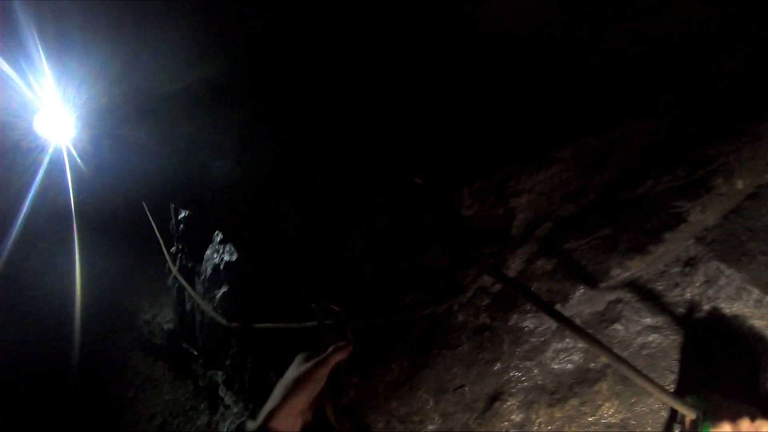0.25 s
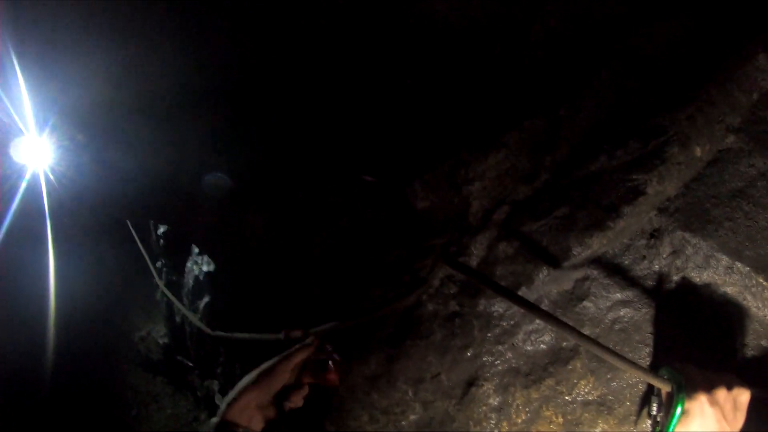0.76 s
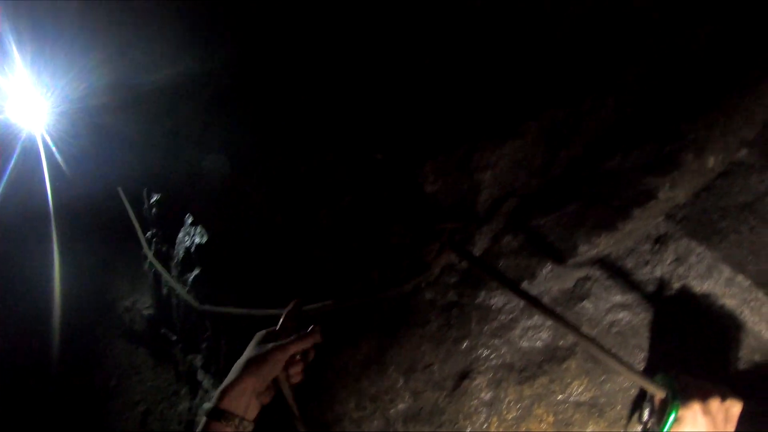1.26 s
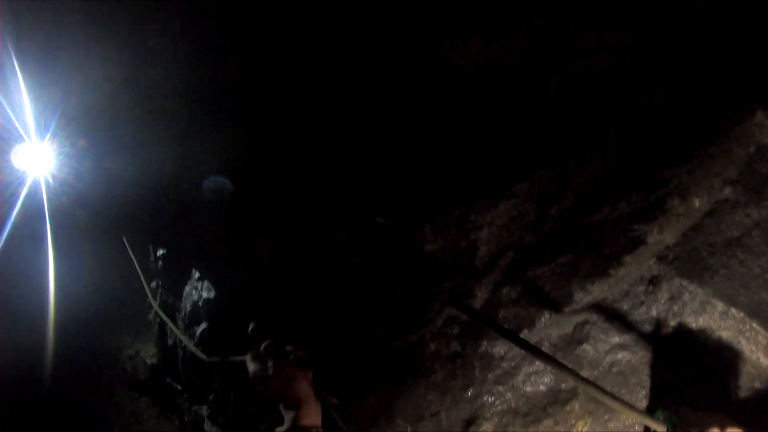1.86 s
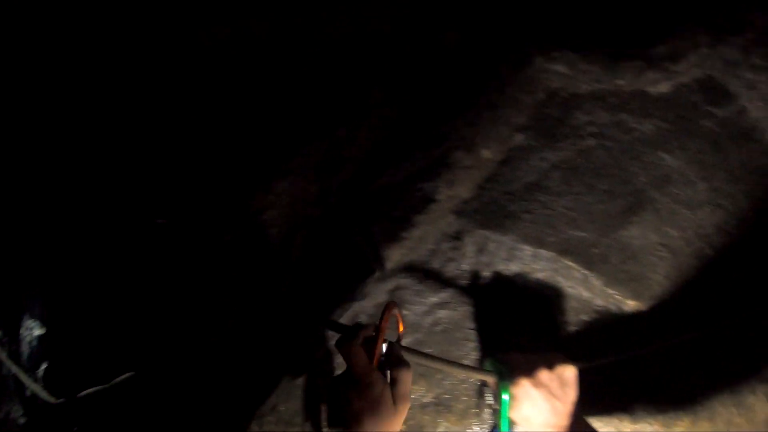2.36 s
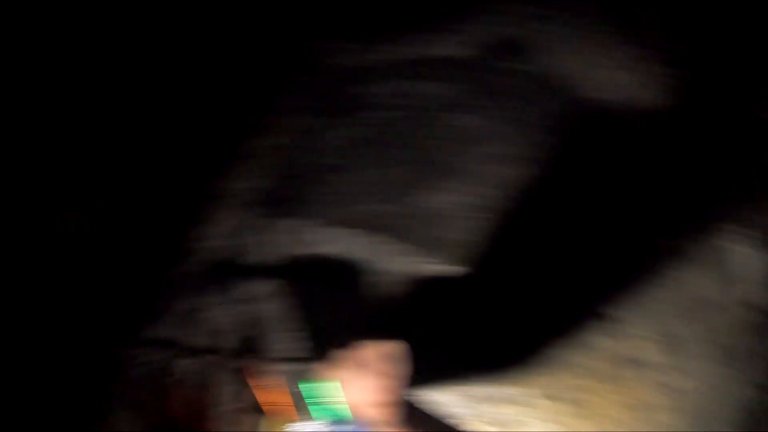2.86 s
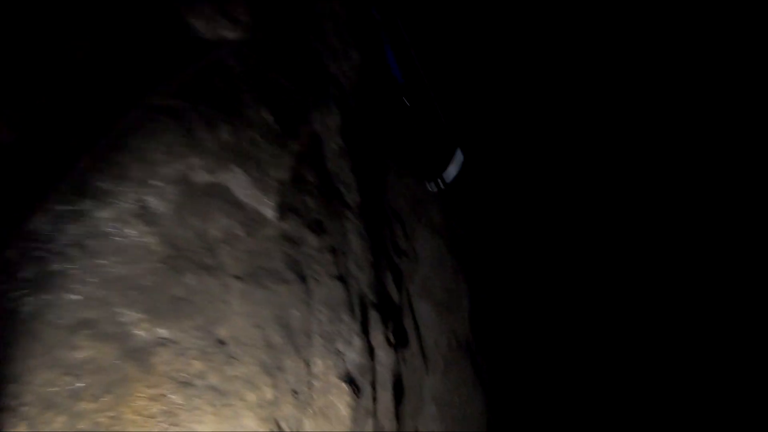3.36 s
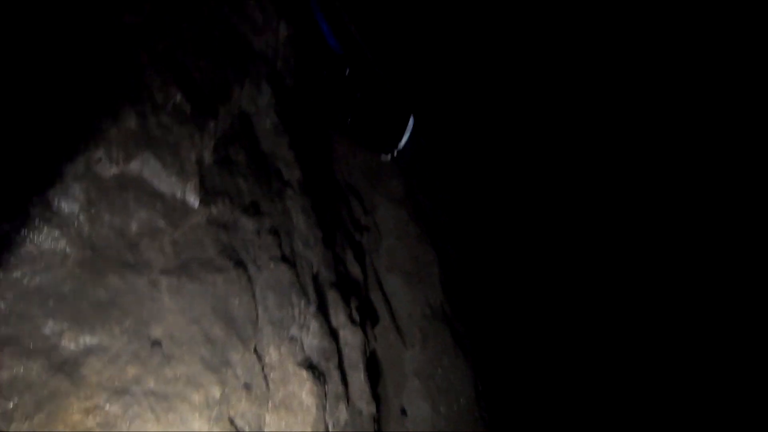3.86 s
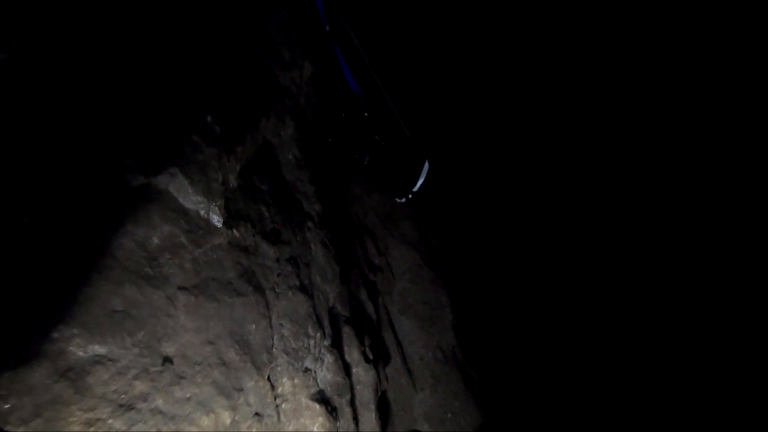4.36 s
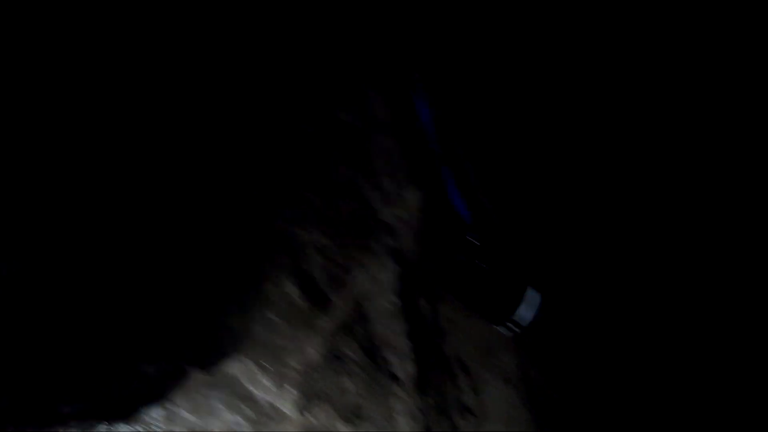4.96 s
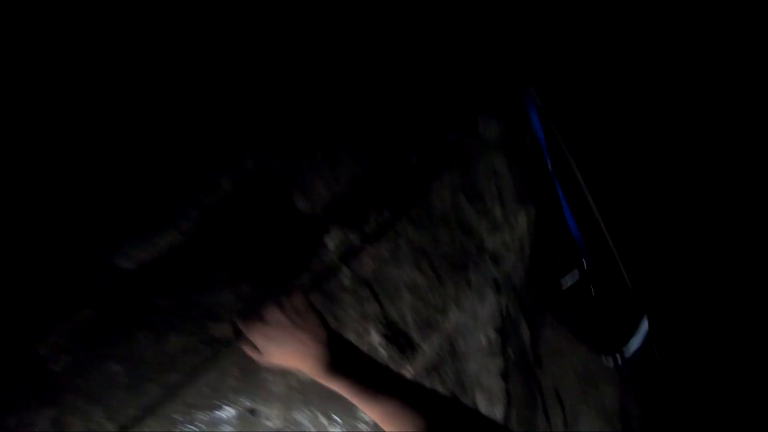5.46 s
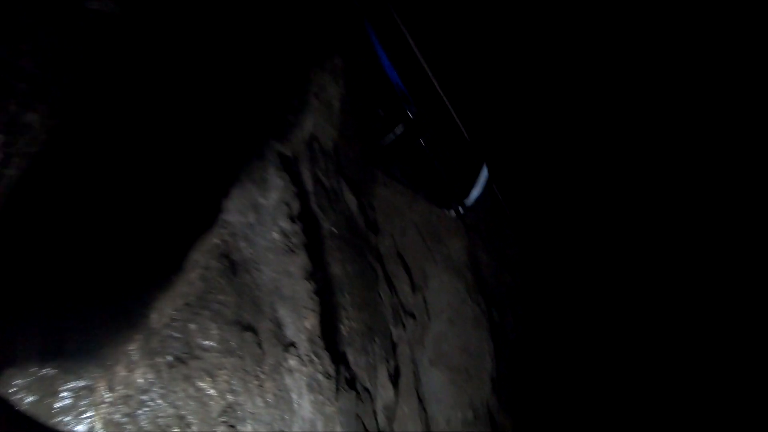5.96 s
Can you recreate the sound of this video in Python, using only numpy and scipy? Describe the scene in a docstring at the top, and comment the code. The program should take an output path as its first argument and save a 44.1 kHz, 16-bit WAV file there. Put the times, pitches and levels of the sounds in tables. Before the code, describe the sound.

Light metal climbing gear clinks and snaps close by, followed by clothing rustle, scraping soles and dull bumps on stone in a reverberant cavern.

```python
"""Carabiners jangle, ding and snap on a rope, then boots scuff gritty rock in a cave, heard from a helmet.
Metal and stone ring as sums of decaying modes under a noise burst, then scatter off a near wall.
Cloth, rope and soles rub as coloured noise with random grains; thuds, creaks and air are swelling noise.
A steady hush, a low drone and one far squeak lie behind.
Reverberant tails follow most blows; noise washes follow the loudest."""
import sys
import numpy as np
from scipy import signal
from scipy.fft import rfft, irfft, next_fast_len
from scipy.io import wavfile
from scipy.ndimage import uniform_filter1d

SR = 44100
rng = np.random.default_rng(int(sys.argv[2]) if len(sys.argv) > 2 else 0)


def digitize_waveform(pressure):
    """Quantize a signal to 16-bit integers and store it at the path in sys.argv[1].

    Rows of a 2-D input are taken as channels; values are limited to [-1, 1].
    """
    field = np.atleast_2d(pressure).T
    bounded = np.clip(field, -1, 1)
    quanta = np.round(bounded * 32767).astype(np.int16)
    wavfile.write(sys.argv[1], SR, quanta)


N = 273928
TIME = np.arange(N) / SR
HIT_TIME = TIME[:SR // 8]
SIDES = np.array([[1], [-1]])  # left, right

# Noise colour of metal striking metal: frequency_hz, density_db (relative, per Hz)
METAL_CRACK = [(300, -54), (750, -14), (1400, -3), (2200, -5.5), (4500, -3), (8000, 5.5), (10500, 0.5),
               (11700, -8.5), (14000, -11.5), (16000, -38.5)]


def from_db(db):
    """Amplitude is the exponential of level: 20 dB is a factor of ten."""
    return np.exp(np.asarray(db) * np.log(10) / 20)


def lean(pan_db):
    """Interaural level difference: left minus right in dB, shared equally between the sides."""
    return from_db(SIDES * pan_db / 2)


def rms_one(x):
    """Normalisation of power: scale to unit rms."""
    return x / np.sqrt(np.mean(x ** 2) + 1e-20)


def at_hz(points, hz):
    """Spectral interpolation along a logarithmic frequency axis."""
    known, values = np.transpose(points)
    return np.interp(np.log(hz + 1), np.log(known), values)


def band(x, low, high):
    """Causal band-pass filtering between two frequencies in Hz."""
    return signal.sosfilt(signal.butter(3, [low, high], "band", fs=SR, output="sos"), x + 1e-18)


def coloured(x, spectrum):
    """Spectral shaping and partial coherence: mid and side noises mix into two related ears; rms 1."""
    # Left-right coherence of noise: frequency_hz, correlation (-1 to 1)
    likeness = [(30, -0.4), (150, 0.048), (280, -0.14), (500, 0.29), (1000, -0.15), (3000, 0.6),
                (5000, 0.48), (8000, -0.33), (14000, 0.15)]
    size = next_fast_len(x.shape[1])
    mid, side = rfft(x, size)
    hz = np.arange(len(mid)) * SR / size
    alike = at_hz(likeness, hz)
    # Extra roll-off well above the last point of the colour
    beyond = 1 / (1 + (hz / (2 * spectrum[-1][0])) ** 4)
    pair = np.sqrt(1 + alike) * mid + np.sqrt(1 - alike) * side * SIDES
    shaped = irfft(pair * beyond * from_db(at_hz(spectrum, hz)), size)
    return rms_one(shaped[:, :x.shape[1]])


def airy(spectrum, level_db):
    """Broadband turbulence modelled as stationary noise of one colour and rms level."""
    return from_db(level_db) * coloured(rng.standard_normal((2, N)), spectrum)


def swell(s, length_s, attack_s, t60):
    """Envelope: linear rise from s, exponential decay from s + length_s."""
    since = TIME - s
    decay_db = -60 * np.clip((since - length_s) / t60, 0, 3)
    return np.clip(since / attack_s, 0, 1) * from_db(decay_db)


def swells(rows, attack_s, t60):
    """Incoherent addition: the powers of overlapping swells (start_s, length_s, level_db) sum."""
    power = sum((from_db(level_db) * swell(s, length_s, attack_s, t60)) ** 2
                for s, length_s, level_db in rows)
    return np.sqrt(power)


def flutter(per_s):
    """Slow random modulation: normal values drawn per_s times a second, joined by straight lines."""
    return np.interp(TIME * per_s, np.arange(N), rng.standard_normal(N))


def friction(spectrum, grains_per_s, grain_db, judder_db):
    """Stick-slip friction: countless tiny slips, stronger single grains and a juddering grip."""
    sizes = from_db(4.3 * np.minimum(rng.exponential(1, N), 4.5))
    struck = rng.random(N) < grains_per_s / SR
    grains = rms_one(struck * sizes * rng.standard_normal((2, N)))
    slips = rng.standard_normal((2, N)) + from_db(grain_db) * grains
    return coloured(slips * from_db(judder_db * flutter(90)), spectrum)


def strike(modes, crack, crack_db, chatter_s, phase_spread, scatter_db, rise_s):
    """Modal impact: damped sinusoids with a phase for each ear, plus a burst of micro-contacts."""
    hz, level_db, t60 = np.transpose(modes)[:, :, None]
    strength_db = level_db + scatter_db * rng.standard_normal(hz.shape)
    phase = 2 * np.pi * rng.random(hz.shape)
    ear_phase = phase_spread * hz / 7000 * rng.standard_normal(hz.shape) * SIDES[:, None]
    decay = from_db(strength_db - 60 * HIT_TIME / t60)
    ring = (decay * np.sin(2 * np.pi * hz * HIT_TIME + phase + ear_phase)).sum(axis=1)
    noise = coloured(rng.standard_normal((2, len(HIT_TIME))), crack)
    burst = noise * from_db(crack_db - 60 * HIT_TIME / chatter_s)
    return (ring + burst) * (1 - np.exp(-HIT_TIME / rise_s))


def contacts(rows, modes, crack, crack_db, phase_spread, scatter_db, rise_s, gain_db):
    """Position-dependent excitation: each blow sets the level of its first 20 ms in three bands."""
    # Edges of the low, middle and treble bands: frequency_hz
    edges_hz = [300, 2800, 5500, 15000]
    out = np.zeros((2, N + len(HIT_TIME)))
    for s, *levels_db, chatter_s, pan_db in rows:
        blow = strike(modes, crack, crack_db, chatter_s, phase_spread, scatter_db, rise_s)
        blow = blow * lean(pan_db)
        start = round(s * SR)
        for level_db, low, high in zip(levels_db, edges_hz, edges_hz[1:]):
            part = band(blow, low, high)
            gain = from_db(level_db + gain_db) / np.std(part[:, :SR // 50])
            out[:, start:start + len(HIT_TIME)] += part * gain
    return out[:, :N]


def near_wall(x, wall_db, wall_t60):
    """Early diffuse reflection: scatter from a rough wall at arm's length, delayed by 2.5 ms."""
    noise = rng.standard_normal((2, len(HIT_TIME)))
    scatter = noise * from_db(-60 * HIT_TIME / wall_t60) * (HIT_TIME > .0025)
    answer = from_db(wall_db) * rms_one(scatter) / np.sqrt(len(HIT_TIME))
    return x + signal.oaconvolve(x, answer, axes=1)[:, :N]


def cave(x, tail_db):
    """Late reverberation: convolution with noise whose treble dies away sooner."""
    # Decay of the chamber: frequency_hz, t60_s
    cave_t60 = [(200, 1.0), (2300, .9), (4500, .8), (8000, .6), (14000, .35)]
    # Colour of its answer: frequency_hz, level_db (relative)
    cave_colour = [(200, -5), (1200, 0.5), (2400, 0), (4500, -3), (7500, 3.5), (14000, 4)]
    t = TIME[:SR]
    edges = np.geomspace(150, 16000, 12)
    white, tail = rng.standard_normal((2, SR)), 0
    for low, high in zip(edges, edges[1:]):
        hz = np.sqrt(low * high)
        decay_db = at_hz(cave_colour, hz) - 60 * t / at_hz(cave_t60, hz)
        tail = tail + band(white, low, high) * from_db(decay_db)
    onset = 1 - np.exp(-t / 0.0041)
    answer = from_db(tail_db) * rms_one(tail * onset) / np.sqrt(SR)
    return x + signal.fftconvolve(x, answer, axes=1)[:, :N]


def wash(rows, colour, gain_db, t60):
    """Diffuse field: echoes of loud blows from every direction blur into exponentially fading noise."""
    power = 0
    for s, _, middle_db, treble_db, _, _ in rows:
        since = np.maximum(TIME - s, 0)
        loudness = np.hypot(from_db(middle_db), from_db(treble_db))
        onset = 1 - np.exp(-since / 0.0044)
        power = power + (loudness * from_db(-60 * since / t60) * onset) ** 2
    return np.sqrt(power) * airy(colour, gain_db)


def hush():
    """Stationary ambient noise: the cave's steady hush."""
    # Colour: frequency_hz, density_db (relative, per Hz)
    hush_colour = [(30, -6), (60, -1), (110, -13), (160, 5), (220, 1.5), (320, -22.5), (800, -1.5),
                   (1500, -23.5), (4000, -17), (7500, -11), (11000, -21.5), (15000, -56)]
    return airy(hush_colour, level_db=-72.5)


def drone():
    """Low-frequency resonance under steady broadband excitation: the chamber's drone."""
    # Colour: frequency_hz, density_db (relative, per Hz)
    drone_colour = [(60, -27), (115, -25.5), (150, -0.5), (185, 0), (260, -2.5), (340, -10.5), (600, -21.5)]
    return airy(drone_colour, level_db=-73) * lean(-1.2)


def hollow_swells():
    """Cavity resonance: noise in the chamber's hollow bands swells and dies away."""
    # Swells: start_s, length_s, level_db (before the trim below)
    hollows = [(1.87, 0.5, -72.5), (3.13, 0.3, -69), (3.45, 0.31, -67), (4.04, 0.22, -55.5),
               (4.52, .17, -62.5), (5.0, 0.28, -57), (5.33, 0.14, -65), (5.85, 0.48, -62.5)]
    # Colour: frequency_hz, density_db (relative, per Hz)
    hollow_colour = [(250, -23), (390, -7.5), (470, 1), (540, -14.5), (660, -12), (820, -3.5), (950, -16),
                     (1600, -16.5)]
    return swells(hollows, attack_s=0.033, t60=0.96) * airy(hollow_colour, level_db=1.5) * lean(-3)


def buffets():
    """Wind-induced pressure noise: gusts buffet the microphone as the head turns, over a steady draught."""
    # Gusts: start_s, level_db (before the trim below)
    gust_rows = [(3.19, -63), (3.3, -66), (3.83, -64), (4.12, -59), (4.44, -67), (4.66, -71), (5.03, -62),
                 (5.23, -63), (5.51, -66), (5.7, -60)]
    # Colour: frequency_hz, density_db (relative, per Hz)
    buffet_colour = [(18, -8.5), (35, 4.5), (52, -4.5), (80, -23.5), (140, -43)]
    length_s = 0.074
    gusts = swells([(s, length_s, level_db) for s, level_db in gust_rows], attack_s=0.017, t60=0.26)
    draught = from_db(-80.5)  # before the same trim
    return np.hypot(gusts, draught) * airy(buffet_colour, level_db=-2.5) * lean(-7)


def far_squeak():
    """Narrow-band noise with a long decay: a distant squeak smeared by the cave."""
    # Squeak: start_s, length_s, level_db (before the trim below)
    squeaks = [(.9, 0.19, -57)]
    # Colour: frequency_hz, density_db (relative, per Hz)
    squeak_colour = [(950, -35), (1130, -16), (1230, -1), (1330, -0.5), (1430, -9), (1620, -16),
                     (1900, -35)]
    return swells(squeaks, attack_s=0.034, t60=1.27) * airy(squeak_colour, level_db=-.3)


def footfalls():
    """Heavily damped impact: the body's weight settles on the rock as a soft, low-frequency thud."""
    # Weight on a boot or hand: start_s, length_s, level_db (before the trim below)
    thuds = [(.59, 0.035, -75), (1.74, .14, -67.5), (2.42, 0.045, -62.5), (4.19, .07, -60),
             (4.525, 0.02, -62.5), (4.63, 0.03, -62), (5.1, .06, -58), (5.965, .05, -52.5)]
    # Colour: frequency_hz, density_db (relative, per Hz)
    thud_colour = [(100, -38), (165, -1.5), (215, -4.5), (290, -5.5), (400, -33), (700, -29)]
    return swells(thuds, attack_s=0.0068, t60=0.48) * airy(thud_colour, level_db=-0.5)


def rubbing_gains():
    """Incoherent addition of friction sources: suit, swishes and scuffs set scrape, rasp and hiss."""
    # All levels here are before the trims in rubbing().
    # Suit rustle as the body moves: time_s, level_db
    movement = [(0, -71.5), (.3, -67.5), (.65, -75), (.95, -66), (1.3, -76.5), (1.62, -71), (1.79, -77.5),
                (2.17, -83), (2.51, -75), (2.74, -61.5), (3.42, -71.5), (4.1, -62), (4.42, -71),
                (4.85, -60), (5.2, -63), (5.88, -57), (6.21, -67.5)]
    # Sleeve or rope slides: start_s, length_s, level_db, hiss_db (against rasp)
    swishes = [(1.095, 0.094, -61, -5), (1.834, 0.057, -73.5, 4), (2.25, 0.19, -74, 6),
               (2.4, 0.019, -63.5, 7), (2.558, 0.37, -68.5, 5.5), (3.7, 0.032, -80, 16),
               (3.861, 0.044, -66, 2.5), (5.407, 0.076, -55, -17), (5.596, 0.047, -59, -38)]
    # Sole drags over rock: start_s, length_s, level_db, grit_db (rasp against scrape)
    scuffs = [(3.972, 0.31, -57.5, -7), (4.109, 0.026, -60.5, 7), (4.163, 0.034, -58, 4),
              (4.516, 0.073, -57, 7), (4.609, 0.047, -45, -1.5), (4.713, 0.031, -51.5, 0.5),
              (4.892, 0.06, -59.5, 0.5), (4.987, 1, -70.5, -11), (5.05, 0.033, -63.5, 5),
              (5.218, 0.043, -58.5, -1.5), (5.365, 0.027, -57, 1), (5.842, 0.064, -56, -1),
              (5.926, 0.073, -59, 0), (6.08, 0.16, -64.5, -28)]
    suit_db = [-11, 0, -1.5]  # scrape, rasp, hiss
    scuff_hiss_db = 3  # against the rasp of the grit
    movement_db = np.interp(TIME, *np.transpose(movement))
    power = np.outer(from_db(suit_db), from_db(movement_db)) ** 2
    for s, length_s, level_db, hiss_db in swishes:
        slide = from_db(level_db) * swell(s, length_s, attack_s=0.021, t60=0.25)
        power[1:] += np.outer(from_db([0, hiss_db]), slide) ** 2
    for s, length_s, level_db, grit_db in scuffs:
        drag = swell(s, length_s, attack_s=0.029, t60=0.22)
        echo = from_db(-15.5) * swell(s, length_s, attack_s=length_s, t60=1.96)
        shares = from_db([0, grit_db, grit_db + scuff_hiss_db])
        power += np.outer(shares, from_db(level_db) * np.hypot(drag, echo)) ** 2
    return np.sqrt(power)


def snags():
    """Random stick-slip: fibres and grit catch and let go in brief surges of uneven size."""
    per_s, surge_db, decay_s = 13, -4, 0.0084
    catches = (rng.random(N) < per_s / SR) * np.minimum(rng.exponential(1, N), 2)
    surge = signal.lfilter([1], [1, -np.exp(-1 / (decay_s * SR))], catches + 1e-18)
    smooth = uniform_filter1d(surge, size=180)  # 4 ms
    return rms_one(1 + from_db(surge_db) * smooth)


def rubbing():
    """Friction noise in three ranges: sleeves and rope rub all along, and soles drag over the rock."""
    # Colours, low range to high: frequency_hz, density_db (relative, per Hz)
    scrape_colour = [(110, -33), (200, -5.5), (310, -3.5), (450, -1), (640, -1), (1000, 0), (1800, 1),
                     (2500, -12.5), (4000, -37)]
    # Rasp: frequency_hz, density_db (relative, per Hz)
    rasp_colour = [(1300, -10.5), (2300, -2), (3400, 1), (4600, -2.5), (6000, -15), (9000, -42)]
    # Hiss: frequency_hz, density_db (relative, per Hz)
    hiss_colour = [(3500, -17), (5500, 2.5), (7500, 4.5), (10300, -3), (11700, -15.5), (14000, -17.5),
                   (16000, -66.5)]
    scrape_gain, rasp_gain, hiss_gain = rubbing_gains()
    scrape = friction(scrape_colour, grains_per_s=800, grain_db=-4.5, judder_db=0.5)
    rasp = friction(rasp_colour, grains_per_s=990, grain_db=-8.5, judder_db=1.0)
    hiss = friction(hiss_colour, grains_per_s=1300, grain_db=-6.5, judder_db=0.4)
    scrape = scrape_gain * from_db(2.5) * scrape
    rasp = rasp_gain * from_db(0.4) * rasp
    hiss = hiss_gain * from_db(-1.2) * hiss
    return scrape * snags() * lean(-2.8) + (rasp + hiss) * snags() * lean(-1.2)


def steps():
    """Damped modal impact on stone: soles and gear bump the rock, and loose stones tip under a boot."""
    # Contact levels are before gain_db; mode levels are before random scatter.
    # Bumps: start_s, low_db, middle_db, treble_db, chatter_t60_s, pan_db
    boot = [(.4804, -63.5, -64.5, -67, 0.039, 1), (.8155, -61, -72, -81, 0.036, 1),
            (2.383, -62.5, -70, -67, 0.094, -2), (3.0865, -60.5, -76.5, -75, 0.037, 5),
            (3.9924, -73, -59, -54, 0.019, -3), (4.0219, -61, -56.5, -56.5, 0.011, -5),
            (4.2065, -52, -60, -49.5, 0.026, -8), (4.4723, -52, -52, -64, 0.15, -1.5),
            (4.5302, -44, -64, -48.5, 0.19, -1.5), (4.654, -41, -42.5, -51, 0.12, -0.5),
            (5.0924, -70, -53, -58.5, 0.037, -2), (5.3239, -76, -52, -73, 0.2, 2),
            (5.9809, -50.5, -53, -49, 0.15, -0.5)]
    # Bump modes: frequency_hz, level_db, t60_s
    boot_modes = [(370, -2.5, 0.069), (488, -8.5, .05), (884, -4.5, .05), (940, 3, 0.024),
                  (1142, -4.5, 0.063), (1286, -10, 0.052), (1480, -11, 0.029), (2920, -19, 0.021)]
    # Tipping stones: start_s, low_db, middle_db, treble_db, chatter_t60_s, pan_db
    tock = [(4.3731, -51, -66, -74, 0.09, -2.5), (5.4735, -53, -62, -62, 0.025, -2.5)]
    # Stone modes: frequency_hz, level_db, t60_s
    tock_modes = [(864, -23, 0.034), (1290, 1, 0.036), (1760, 3.5, 0.026), (1930, 4, 0.019),
                  (2590, -7, .022)]
    # Contact noise on stone: frequency_hz, density_db (relative, per Hz)
    stone_crack = [(100, -13), (200, 17), (500, 13), (1500, 11), (4000, -13), (8000, -6.5), (11000, -29),
                   (15000, -51)]
    blows = contacts(boot, boot_modes, stone_crack, crack_db=5.5, phase_spread=1.32,
                     scatter_db=6.0, rise_s=0.0002, gain_db=-2.33)
    blows += contacts(tock, tock_modes, stone_crack, crack_db=-4, phase_spread=2.1,
                      scatter_db=6.0, rise_s=0.0009, gain_db=0)
    return cave(near_wall(blows, wall_db=-7.0, wall_t60=0.15), tail_db=-6.5)


def rope():
    """Stick-slip under load: the rope's sheath slips through a carabiner with a short nasal creak."""
    # Creaks: start_s, length_s, level_db
    creaks = [(1.315, .012, -64), (3.87, 0.035, -61.5)]
    # Colour: frequency_hz, density_db (relative, per Hz)
    creak_colour = [(1800, -25), (2400, -4), (2700, -4), (3300, -22), (4500, -40)]
    sheath = friction(creak_colour, grains_per_s=320, grain_db=-4, judder_db=0)
    return swells(creaks, attack_s=0.0092, t60=0.11) * sheath


def hardware():
    """Modal vibration of light metal: harness gear and carabiners ring, then reverberate."""
    # Contact levels are before gain_db; mode levels are before random scatter.
    # Harness gear knocking: start_s, low_db, middle_db, treble_db, chatter_t60_s, pan_db
    jangle = [(0.0828, -59, -60, -47, 0.071, 1), (0.0866, -55.5, -42, -44.5, 0.038, -2),
              (0.1003, -58, -50, -51, 0.035, -2), (0.131, -60.5, -59, -66, 0.11, 0),
              (0.1744, -67, -53.5, -58.5, 0.059, 0), (0.235, -57, -56, -57, 0.062, -0.5),
              (0.2735, -45.5, -44.5, -57, 0.043, 0), (0.293, -54, -50.5, -52, 0.024, 1),
              (0.3327, -49.5, -43, -41, 0.019, 0), (0.4156, -87, -66, -70, 0.05, 2),
              (0.4804, -74, -62.5, -66, 0.041, -1), (0.512, -67.5, -56, -59, 0.043, -2),
              (0.6635, -71.5, -70, -69.5, 0.026, -1), (2.3257, -69.5, -69, -81, 0.061, -11)]
    # Metal touched while damped in the hand: start_s, low_db, middle_db, treble_db, chatter_t60_s, pan_db
    tick = [(0.8147, -54.5, -47, -52.5, 0.0065, -2.2), (1.1498, -68, -54.5, -57.5, 0.011, -1)]
    # Modes of both: frequency_hz, level_db, t60_s
    jangle_modes = [(1941, -3, 0.033), (2146, -14.5, .07), (3070, -26, 0.027), (3643, 5, 0.037),
                    (4230, 0.5, 0.043), (4790, -4, 0.027), (4760, -14, 0.031), (6670, -5.5, 0.061),
                    (7040, 6, 0.02), (7430, 3.5, 0.049), (9440, -4, 0.066), (9630, -25, 0.032),
                    (10200, -1, 0.056)]
    # Hanging carabiner tapped: start_s, low_db, middle_db, treble_db, chatter_t60_s, pan_db
    ding = [(0.6021, -72, -62.5, -71, 0.05, 1), (0.7298, -54.5, -48, -59.5, 0.14, -2.5),
            (0.8915, -80, -50, -67, 0.055, -1), (0.9299, -69, -58, -70, 0.12, -1),
            (0.9838, -55.5, -49, -66, 0.081, -2.5), (1.0586, -60, -59, -69, 0.05, -3),
            (1.104, -59, -58, -63, 0.037, -6), (1.1502, -52.5, -41.5, -57.5, 0.067, -0.5)]
    # Its modes: frequency_hz, level_db, t60_s
    ding_modes = [(1960, -18, 0.05), (3510, -3, 0.044), (3710, 13, 0.038), (3640, -17, 0.014),
                  (5900, -13, .04), (7050, 2, 0.048), (7500, -15, 0.065), (10400, -17, .07)]
    # Carabiner hooked beside another: start_s, low_db, middle_db, treble_db, chatter_t60_s, pan_db
    hook = [(2.5795, -56, -45.5, -42.5, 0.04, -0.92)]
    # Its modes: frequency_hz, level_db, t60_s
    hook_modes = [(2050, -12, 0.042), (3360, -8, 0.14), (4200, -9, 0.0533), (6640, -8, 0.061),
                  (7000, -2.5, 0.06), (7300, -17.5, 0.0496), (10120, 3.5, 0.1), (10670, 3, .07)]
    gear = contacts(jangle, jangle_modes, METAL_CRACK, crack_db=11.5, phase_spread=0.34,
                    scatter_db=6.5, rise_s=0.00028, gain_db=0.0)
    gear += contacts(ding, ding_modes, METAL_CRACK, crack_db=-5.5, phase_spread=0.26,
                     scatter_db=2.5, rise_s=0.00019, gain_db=0.0)
    gear += contacts(hook, hook_modes, METAL_CRACK, crack_db=8.5, phase_spread=0.75,
                     scatter_db=5.5, rise_s=0.00022, gain_db=0.5)
    gear += contacts(tick, jangle_modes, METAL_CRACK, crack_db=21, phase_spread=0.31,
                     scatter_db=19, rise_s=.0001, gain_db=-2)
    return cave(near_wall(gear, wall_db=-10.5, wall_t60=0.13), tail_db=-15.0)


def gate_clicks():
    """Short modal impact with early reflections alone: a gate worked by the thumb clicks."""
    # Clicks: start_s, low_db, middle_db, treble_db, chatter_t60_s, pan_db (levels before gain_db)
    latch = [(1.605, -47, -45, -64, 0.0072, 1), (3.0915, -48.5, -50, -78, 0.011, 3.5),
             (3.5948, -56, -49, -61.5, 0.022, 6), (3.6025, -65, -62, -69, 0.03, -12)]
    # Gate modes: frequency_hz, level_db (before random scatter), t60_s
    latch_modes = [(2200, -11, 0.018), (3360, 3.5, 0.011), (3930, -0.5, 0.05), (3730, 10, 0.0078),
                   (4380, 5.5, 0.011), (5040, -9, 0.029), (7300, -5, 0.023), (9600, -10.5, .035)]
    gates = contacts(latch, latch_modes, METAL_CRACK, crack_db=-5.0, phase_spread=0.35,
                     scatter_db=7.0, rise_s=0.00034, gain_db=2.5)
    return near_wall(gates, wall_db=-8.5, wall_t60=0.11)


def hard_blows():
    """Strong modal impact feeding a diffuse field: a gate slaps shut and carabiners clack."""
    # Contact levels are before gain_db; mode levels are before random scatter.
    # Sprung gate slapping shut: start_s, low_db, middle_db, treble_db, chatter_t60_s, pan_db
    snap = [(2.7702, -42, -20.5, -26, 0.019, -1.5)]
    # Its modes: frequency_hz, level_db, t60_s
    snap_modes = [(2060, -33, 0.11), (2630, -22, 0.064), (3070, -26, 0.017), (4055, -11.5, 0.014),
                  (4410, 6.5, 0.0085), (4750, 2, 0.017), (7170, -12.5, 0.039), (7400, -14.5, 0.026),
                  (8380, -23, 0.021), (9900, -16.5, 0.039)]
    # Carabiner against carabiner: start_s, low_db, middle_db, treble_db, chatter_t60_s, pan_db
    clack = [(3.1402, -46.5, -38, -38.5, 0.01, 0.91), (3.1902, -58, -34.5, -29, 0.033, -0.39),
             (5.7953, -49.5, -36.5, -31.5, 0.021, -0.86)]
    # Its modes: frequency_hz, level_db, t60_s
    clack_modes = [(2470, 12, 0.048), (2800, 11, 0.015), (3610, 8.5, 0.025), (5040, 13, 0.02),
                   (6030, 13, 0.037), (7100, 3, 0.018), (7300, 12, 0.044), (8450, 10.6, 0.018)]
    # Colour of the wash after the slap: frequency_hz, density_db (relative, per Hz)
    gate_echo = [(900, -46), (1600, -25.5), (2200, -2), (2900, -6.5), (3700, -9.5), (4500, 0.5), (4900, 1),
                 (5400, -8.5), (8400, -4), (10500, -11.5), (12000, -20), (15500, -36.5)]
    # Colour of the wash after a clack: frequency_hz, density_db (relative, per Hz)
    clack_echo = [(900, -15.5), (1600, -5), (2400, -4.5), (3600, -4), (4400, -6), (5900, 0), (7800, 3.5),
                  (9000, -4.5), (10400, -9), (11700, -24), (15500, -34)]
    slap = contacts(snap, snap_modes, METAL_CRACK, crack_db=1, phase_spread=.25,
                    scatter_db=0.5, rise_s=0.00024, gain_db=-1.0)
    clacks = contacts(clack, clack_modes, METAL_CRACK, crack_db=20, phase_spread=1.0,
                      scatter_db=7, rise_s=0.00011, gain_db=-2.0)
    echoes = wash(snap, gate_echo, gain_db=-21.0, t60=0.78)
    echoes = echoes + wash(clack, clack_echo, gain_db=-14.0, t60=0.56)
    return near_wall(slap + clacks, wall_db=-11.5, wall_t60=0.086) + echoes


def scene():
    """Linear superposition of cave, body, rope and gear."""
    surroundings = hush() + drone() + hollow_swells() + buffets() + far_squeak()
    body = footfalls() + rubbing() + steps()
    return surroundings + body + rope() + hardware() + gate_clicks() + hard_blows()


def record(dry):
    """Band limiting: a steep elliptic low-pass removes the top of the treble."""
    cutoff_hz = 15800
    return signal.sosfilt(signal.ellip(10, .2, 80, cutoff_hz, fs=SR, output="sos"), dry)


dry = scene()
out = record(dry)
digitize_waveform(out)
```